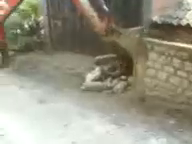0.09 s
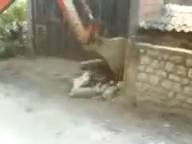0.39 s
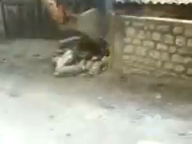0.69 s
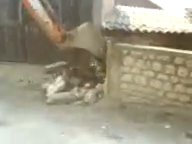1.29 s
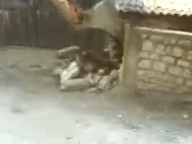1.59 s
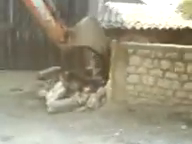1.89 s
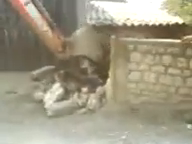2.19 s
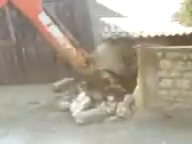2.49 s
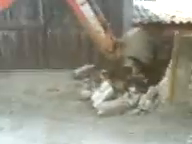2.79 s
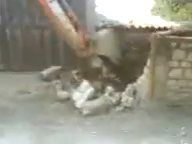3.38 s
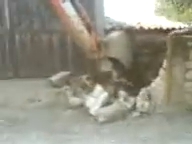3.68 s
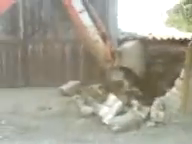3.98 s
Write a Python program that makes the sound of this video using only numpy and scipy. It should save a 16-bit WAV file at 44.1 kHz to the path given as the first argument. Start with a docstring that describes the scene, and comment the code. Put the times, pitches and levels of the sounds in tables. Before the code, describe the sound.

A stone wall collapses at once with a heavy thud, gritty crumbling, and stones knocking and clinking until about 1.2 seconds. An excavator's diesel drones throughout with a faint hydraulic whine that sags slightly later on. From 2.3 to 3.2 seconds a lighter fall of rubble follows, with a few last knocks near 3.8. The yard adds short, dull echoes, and the small microphone cuts the treble.

```python
"""Excavator pulling down a stone wall

Masonry gives way in gritty crumbles, blocks thud on the ground, stones knock and clink on each other.
The diesel drones throughout; the whine of its hydraulic pump sags under load.
Heard in a walled yard through a small narrow-band microphone."""
import sys
import numpy as np
from scipy import signal
from scipy.fft import rfft, irfft
from scipy.io import wavfile
from scipy.ndimage import uniform_filter1d

SR = 44100
rng = np.random.default_rng(int(sys.argv[2]) if len(sys.argv) > 2 else 0)


def bounce(signal):
    """Save signal as a 16-bit WAV file at the path given by the first command-line argument."""
    frames = np.transpose(np.atleast_2d(signal))
    limited = np.clip(frames, -1, 1)
    pcm = np.round(limited * 32767).astype(np.int16)
    wavfile.write(sys.argv[1], SR, pcm)


N = 176400
TIME_S = np.arange(N) / SR
AGE_S = TIME_S[:SR // 2]  # time within one burst
BINS_HZ = np.arange(N // 2 + 1) / N * SR

# masonry giving way: t/s, level/dB, rise/s, hold/s, fall/(s per 20 dB), tilt/(dB per octave)
CRUMBLE_EVENTS = [(0.0, -16.5, 0.002, 0.0079, 0.15, 2), (.08, -27, .01, .015, 0.1, -0.5),
                  (0.117, -22.5, .015, 0.019, 0.3, -4), (0.199, -17.5, 0.013, 0.069, .2, 2),
                  (0.356, -17.5, 0.007, 0.032, 0.17, -0.4), (0.541, -24.5, 0.0034, 0.027, -0.02, 0.5),
                  (.622, -12, 0.021, .025, 0.12, .5), (.882, -17, 0.014, 0.0079, 0.09, 1),
                  (0.939, -19, 0.029, 0.031, 0.25, 1), (2.292, -19.5, .015, 0.017, 0.12, 4),
                  (2.345, -23.5, 0.011, 0.0097, 0.17, 0.5), (2.425, -34, 0.013, .02, 0.7, -2),
                  (2.66, -20, 0.053, 0.026, -0.04, 4), (2.997, -28.5, 0.014, 0.016, 0.32, 1),
                  (3.767, -29.5, .02, 0.052, 0, -7.5)]
# grain spectrum: f/Hz, relative level/dB
GRIT_SPECTRUM = [(330, -0.5), (600, -3), (850, 2.5), (1150, 2.5), (1500, -1), (2100, 3), (2900, -1),
                 (3700, -9)]
# blocks landing: t/s, level/dB, f/Hz
THUD_EVENTS = [(0.0, -7, 155), (0.149, -19, 167.5), (0.239, -17, 154.6), (0.304, -23, 164.5),
               (0.384, -21, 152.7), (.445, -19.5, 160.7), (.474, -21, 168.6), (0.512, -21.5, 243),
               (.764, -17, 266.5), (1.065, -21, 168.4), (2.604, -26.5, 313), (2.763, -21, 240.5),
               (2.785, -28.5, 172), (2.925, -27, 250), (3.88, -27, 240)]
# engine harmonics: multiple of firing rate, level/dB
ENGINE_ORDERS = [(1, -51.5), (2, -47.5), (3, -54), (4, -50), (5, -44.5), (6, -47), (7, -50.5), (8, -51),
                 (10, -55.5)]
# pump fundamental: t/s, f/Hz
PUMP_PITCH = [(0, 246.7), (1.25, 246.2), (1.55, 249), (2.24, 249.4), (2.8, 243.7), (3.33, 247.1),
              (3.6, 243.5), (4, 238.8)]
# pump harmonics: multiple of fundamental, level/dB
PUMP_ORDERS = [(1, -36.5), (2, -44), (3, -44.5), (4, -46.5), (5, -49)]
# machine noise spectrum: f/Hz, relative level/dB
CLATTER_SPECTRUM = [(25, -42), (50, -20.5), (85, -18.5), (135, -9.5), (195, 1.5), (260, 1), (340, -1.5),
                    (450, -6.5), (630, -10), (820, -7), (960, -1.5), (1120, -7.5), (1500, -7), (1720, -6),
                    (1950, -13), (2450, -14), (3300, -22.5), (4200, -26)]
# machine noise loudness: t/s, level/dB
CLATTER_LEVEL = [(0, -23.5), (1.15, -33), (1.45, -31), (1.78, -30.5), (2.2, -32), (2.9, -30.5),
                 (3.4, -30.5), (3.72, -30.5), (4, -28)]
# stone striking or grinding on stone: t/s, level/dB, f/Hz, rise/s, chatter fall/(s per 20 dB)
KNOCK_EVENTS = [(.043, -24, 1876, .008, 0.5), (0.07, -14, 2785, .002, 0.06),
                (.089, -18.5, 884, 0.0081, 0.05), (.13, -16, 1293, .01, -0.05),
                (.125, -20.5, 2430, .015, 0), (.153, -12.5, 1158, 0.0032, .02),
                (.205, -25.5, 900, .005, 0.8), (.213, -21, 2884, 0.0068, 0.35),
                (.24, -16, 1116, .005, -0.04), (.273, -13.5, 1042, 0.0048, -0.45),
                (.275, -18.5, 2930, .002, -0.01), (.286, -17, 964, .003, 0.11),
                (.292, -18.5, 1587, 0.0025, 0.13), (.338, -14.5, 1102, 0.006, 0.12),
                (.357, -14, 1890, 0.0067, -0.35), (.368, -17.5, 2805, 0.0046, 0.11),
                (.435, -18, 1081, 0.0097, 0.02), (.541, -15, 1126, 0.0022, 0.1),
                (.542, -18, 1630, 0.0023, 0.17), (.626, -14, 1107, 0.0077, 0.13),
                (.638, -12, 423, .006, -0.71), (.646, -7.5, 2380, .006, .025),
                (0.664, -25, 1065, 0.0047, 0.07), (.892, -15.5, 810, 0.0094, 0.18),
                (.897, -15.5, 1900, 0.0055, 0.18), (1.045, -24, 810, 0.0073, 0.07),
                (2.301, -21, 898, 0.0022, 0.1), (2.308, -10.5, 893, .005, .035),
                (2.308, -13, 1812, .005, 0.0053), (2.346, -20, 1640, .002, 0),
                (2.366, -18, 993, 0.0056, -0.04), (2.381, -21.5, 1203, 0.004, 0.09),
                (2.43, -15.5, 1107, 0.0026, -0.02), (2.444, -19.5, 1505, 0.0031, 0.07),
                (2.468, -25, 1313, .005, 0.05), (2.592, -26, 1065, 0.0056, 0.17),
                (2.683, -19.5, 2050, 0.0047, 0.12), (2.703, -12.5, 2200, 0.0087, 0.01),
                (2.724, -12.5, 2100, 0.0042, 0.0053), (2.724, -15, 473, 0.0066, 0.01),
                (2.722, -16, 800, .008, -0.03), (2.742, -18.5, 380, .008, -0.11),
                (3.008, -21.5, 760, 0.0054, -0.15), (3.011, -19.5, 2173, .005, -0.22),
                (3.047, -28, 597, 0.007, 0.43), (3.16, -21.5, 1025, 0.007, 0.06),
                (3.246, -27, 981, 0.0082, -0.13), (3.767, -10.5, 939, .0015, 0.0051),
                (3.779, -14, 1024, 0.0033, 0.01), (3.781, -25, 558, 0.0046, 0.35),
                (3.799, -17.5, 1014, .003, 0.1)]
# hard edges ringing: t/s, level/dB, f/Hz
CLINK_EVENTS = [(0.068, -12.5, 1866), (.952, -17, 2800), (.982, -8.5, 2330), (1.017, -18.5, 2724),
                (1.186, -24, 2765), (2.995, -29.5, 2860), (3.011, -23, 2760)]

GRAINS_PER_S, CONTACTS_PER_S = 2200, 1800
FREE_FIRING_HZ, FREE_PUMP_HZ = 57.14, 249.4  # unloaded


def from_db(db):
    """Decibels to gain."""
    return 10 ** (np.asarray(db) / 20)


def unit_rms(x):
    """Scale to rms 1."""
    return x / np.sqrt(np.mean(x ** 2) + 1e-20)


def in_time(rows):
    """Control curve at every sample."""
    return np.interp(TIME_S, *np.transpose(rows))


def db_at(spectrum, hz):
    """Interpolate a spectrum over log frequency."""
    points_hz, db = np.transpose(spectrum)
    return np.interp(np.log(hz + 1e-9), np.log(points_hz), db)


def filtered(x, hz, kind, order=2):
    """Butterworth filter."""
    return signal.sosfilt(signal.butter(order, hz, kind, fs=SR, output="sos"), x + 1e-18)


def resonance(x, hz, q):
    """One resonance, peak gain 1."""
    return signal.lfilter(*signal.iirpeak(hz, q, fs=SR), x + 1e-18)


def drift(corner_hz):
    """Slow random wander, rms 1."""
    return unit_rms(irfft(rfft(rng.standard_normal(N)) / (1 + (BINS_HZ / corner_hz) ** 2), N))


def envelope(rise_s, hold_s, fall_s):
    """Linear rise, hold, then 20 dB down per fall_s (1 ms at least)."""
    attack = np.minimum(AGE_S / max(rise_s, 1e-4), 1)
    return attack * 10 ** (-np.maximum(AGE_S - rise_s - hold_s, 0) / max(fall_s, 1e-3))


def clicks(per_s, spread_db=4):
    """Random impulses of uneven size."""
    n = len(AGE_S)
    sizes = from_db(spread_db * np.minimum(rng.exponential(1, n), 4)) * rng.choice([-1, 1], n)
    return sizes * (rng.random(n) < per_s / SR)


def evened(x, share=0.57):
    """Partly level a grainy sound's swells over 10 ms; rms 1."""
    power = uniform_filter1d(unit_rms(x) ** 2, size=441)
    return unit_rms(x / (np.abs(power) + 1e-3) ** (share / 2))


def harmonics(turns, orders, flutter_db=2.2):
    """Fluttering tones of a rotating part."""
    return sum(np.sqrt(2) * from_db(db + flutter_db * drift(20))
               * np.sin(2 * np.pi * (k * turns + rng.random())) for k, db in orders)


def add(out, t_s, sound):
    """Mix a sound in at t_s."""
    i = int(np.clip(t_s * SR, 0, N - 1))
    out[i:i + len(sound)] += sound[:N - i]


def crumbles(ring_cycles=24, debris_db=-10.5, debris_delay_s=0.035):
    """Mortar and chips shower, each grain ringing briefly; heavier debris rumbles down just after."""
    out = np.zeros(N)
    grain_hz = np.geomspace(330, 3700, 22)
    grain_q = ring_cycles * np.pi / np.log(1000)  # 60 dB down after ring_cycles
    for t_s, db, rise_s, hold_s, fall_s, tilt_db in CRUMBLE_EVENTS:
        grains = clicks(GRAINS_PER_S)
        band = rng.integers(0, len(grain_hz), len(AGE_S))
        band_db = db_at(GRIT_SPECTRUM, grain_hz) + tilt_db * np.log2(grain_hz / grain_hz[0])
        gains = from_db(band_db) / np.sqrt(grain_hz)
        grit = sum(gains[k] * resonance(grains * (band == k), hz, grain_q)
                   for k, hz in enumerate(grain_hz))
        add(out, t_s, from_db(db) * evened(grit) * envelope(rise_s, hold_s, fall_s))
        rumble = filtered(filtered(clicks(GRAINS_PER_S), 131, "high"), 380, "low", order=4)
        debris = evened(rumble) * envelope(2 * rise_s, hold_s, 1.7 * fall_s)
        add(out, t_s + debris_delay_s, from_db(db + debris_db) * debris)
    return out


def thuds():
    """Heavy blocks land: a few low cycles and a dull puff of earth."""
    out = np.zeros(N)
    shape = envelope(rise_s=0.0027, hold_s=0.013, fall_s=0.033)
    for t_s, db, hz in THUD_EVENTS:
        puff = unit_rms(filtered(clicks(CONTACTS_PER_S), [0.65 * hz, 2 * hz], "band"))
        thump = np.sqrt(2) * np.sin(2 * np.pi * hz * AGE_S)
        add(out, t_s, from_db(db) * (thump + 0.37 * puff) * shape)
    return out


def excavator(speed_jitter=0.0042, flicker_db=0.5):
    """Diesel and pump share one shaft; the clatter flickers and throbs with each firing."""
    pump_hz = in_time(PUMP_PITCH) * (1 + speed_jitter * drift(9))
    pump_turns = np.cumsum(pump_hz) / SR
    firings = pump_turns * FREE_FIRING_HZ / FREE_PUMP_HZ
    throb = 1 + 0.17 * np.cos(2 * np.pi * firings)
    noise = rng.standard_normal(N) * throb * from_db(flicker_db * drift(25))
    clatter = unit_rms(irfft(rfft(noise) * from_db(db_at(CLATTER_SPECTRUM, BINS_HZ)), N))
    drone = harmonics(firings, ENGINE_ORDERS)
    whine = harmonics(pump_turns, PUMP_ORDERS)
    return drone + whine + from_db(in_time(CLATTER_LEVEL)) * clatter


def knocks(clean_hit_s=0.003, body_q=5.7, crack_db=-8):
    """Stone strikes stone, then the rough faces chatter: damped resonance plus broad crack."""
    out = np.zeros(N)
    impulse = 1.0 * (AGE_S == 0)
    for t_s, db, hz, rise_s, fall_s in KNOCK_EVENTS:
        shape = envelope(rise_s, hold_s=0.005, fall_s=fall_s)
        strike = unit_rms(resonance(resonance(impulse, hz, q=6), hz, q=2))
        strike_gain = 0.97 * np.exp(-abs(rise_s) / clean_hit_s)  # slow rise: mostly grinding
        contacts = clicks(CONTACTS_PER_S)
        body = unit_rms(resonance(resonance(contacts, hz, body_q), hz, body_q / 2))
        crack = unit_rms(filtered(contacts, [0.63 * hz, 1.7 * hz], "band", order=3))
        chatter = unit_rms(evened(body + from_db(crack_db) * crack) * shape)
        shape_rms = np.sqrt(np.mean(shape ** 2))
        add(out, t_s, from_db(db) * shape_rms * unit_rms(strike_gain * strike + chatter))
    return out


def clinks():
    """Hard edges ring briefly, roughened by the grinding contact."""
    out = np.zeros(N)
    shape = envelope(rise_s=0.0017, hold_s=0.0069, fall_s=0.013)
    for t_s, db, hz in CLINK_EVENTS:
        grind = unit_rms(resonance(clicks(CONTACTS_PER_S), hz, q=2.1))
        ring = np.sqrt(2) * np.sin(2 * np.pi * hz * AGE_S)
        add(out, t_s, from_db(db) * (ring + 0.4 * grind) * shape)
    return out


def yard_echoes(x, level_db=-16.5, t60_s=0.35, top_hz=2400):
    """Dull scattered reflections off the surrounding walls."""
    reflections = clicks(per_s=900) * envelope(rise_s=0.0068, hold_s=0.0079, fall_s=t60_s / 3)
    echoes = signal.fftconvolve(x, filtered(reflections, top_hz, "low"))[:N]
    return from_db(level_db) * np.std(x) * unit_rms(echoes)


def scene():
    """Falling masonry and its echoes over the machine; mono."""
    rubble = crumbles() + knocks() + clinks()
    return (rubble + yard_echoes(rubble) + thuds() + excavator())[None]


def record(dry, low_hz=34.8, top_hz=3347, stop_hz=5200, overload=0.61):
    """Small microphone: rounded peaks, steep treble cut."""
    rounded = overload * np.tanh(filtered(dry, low_hz, "high") / overload)
    narrow = filtered(rounded, top_hz, "low", order=10)
    return signal.sosfilt(signal.cheby2(12, 70, stop_hz, fs=SR, output="sos"), narrow)


dry = scene()
out = record(dry)
bounce(out)
```